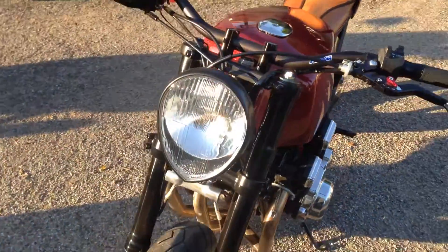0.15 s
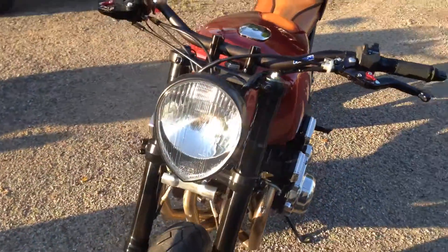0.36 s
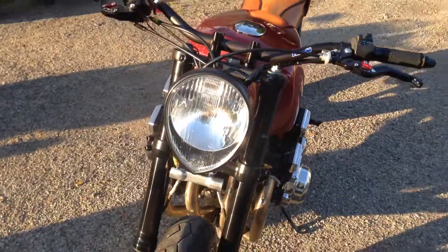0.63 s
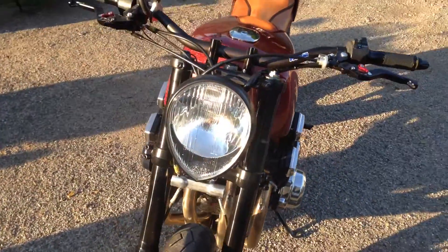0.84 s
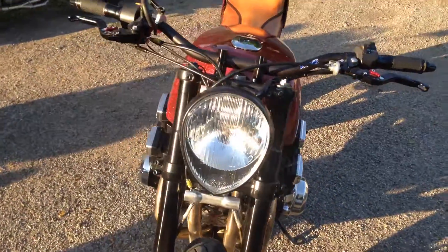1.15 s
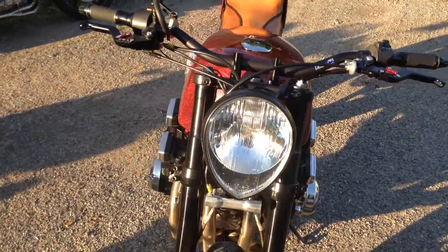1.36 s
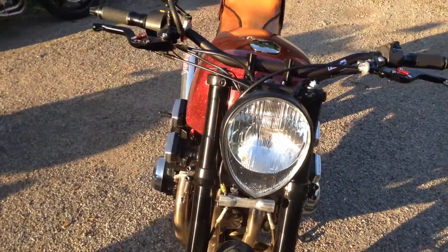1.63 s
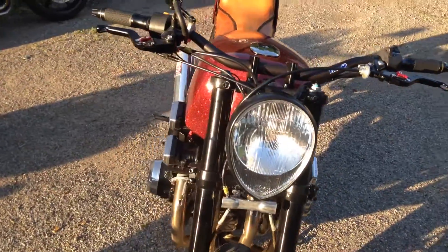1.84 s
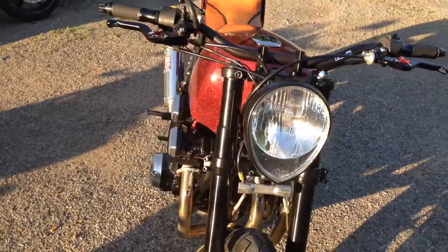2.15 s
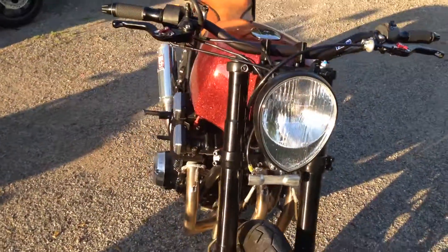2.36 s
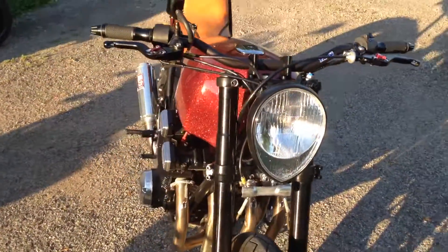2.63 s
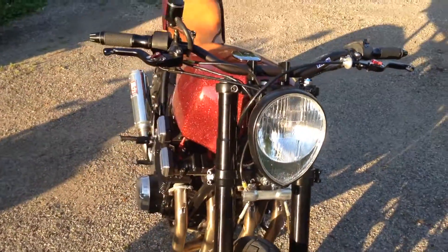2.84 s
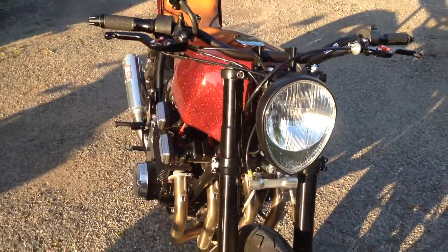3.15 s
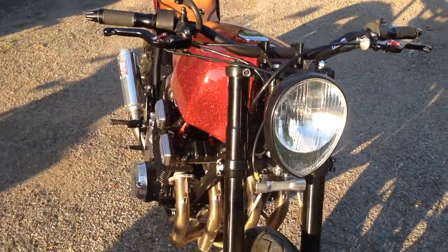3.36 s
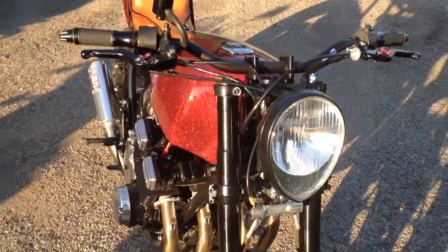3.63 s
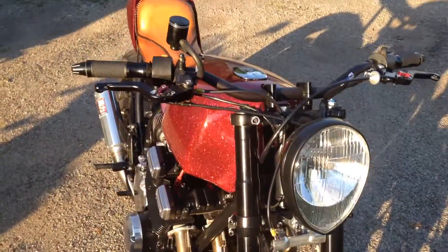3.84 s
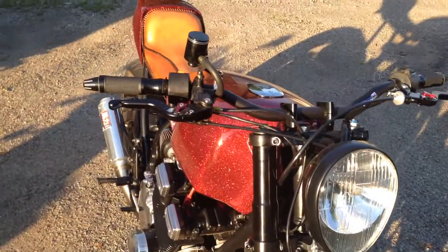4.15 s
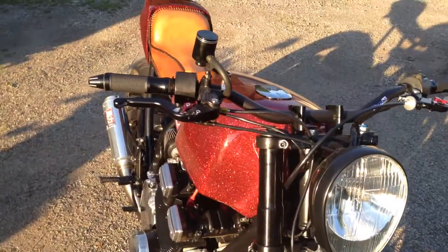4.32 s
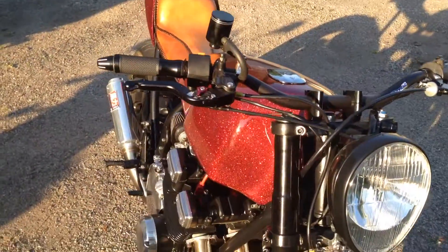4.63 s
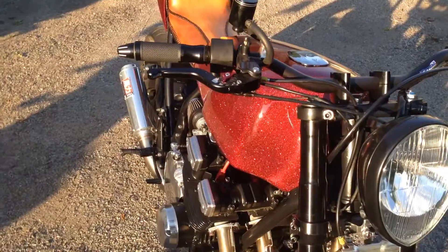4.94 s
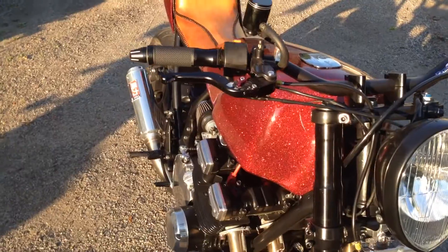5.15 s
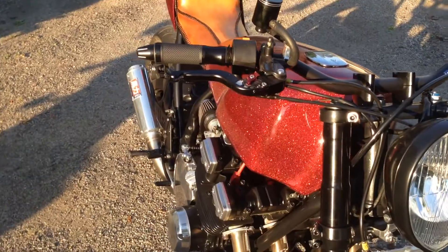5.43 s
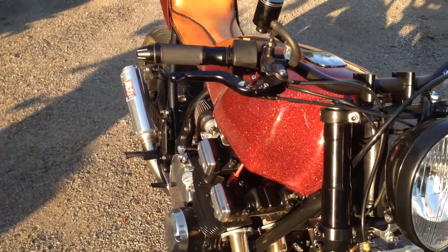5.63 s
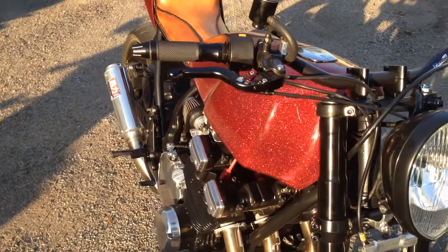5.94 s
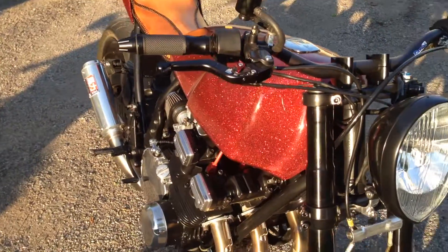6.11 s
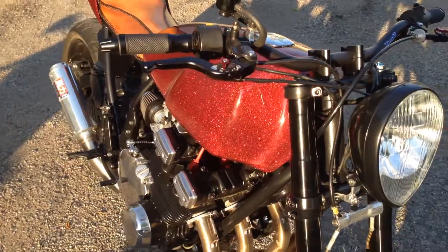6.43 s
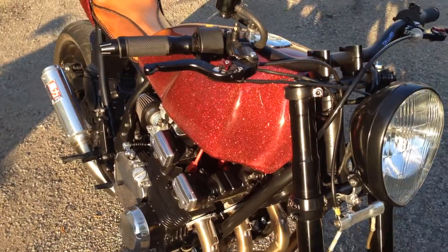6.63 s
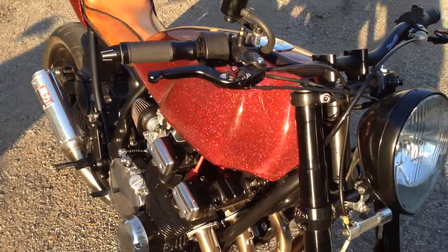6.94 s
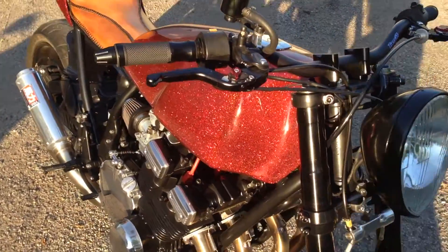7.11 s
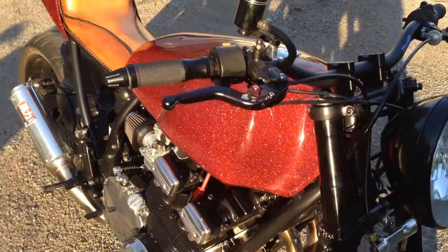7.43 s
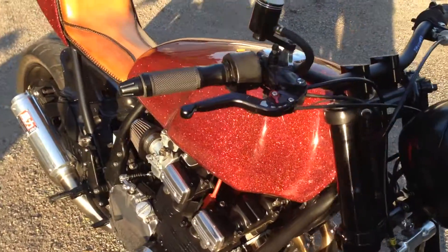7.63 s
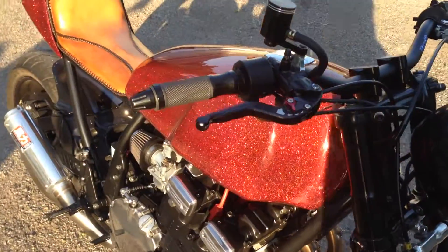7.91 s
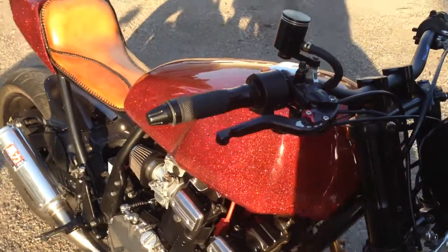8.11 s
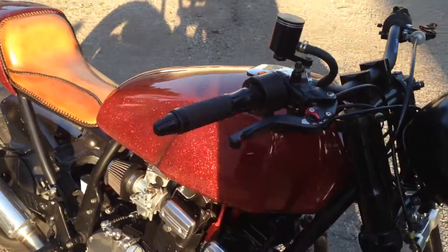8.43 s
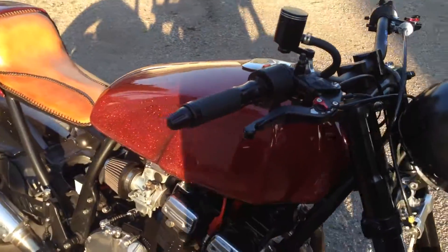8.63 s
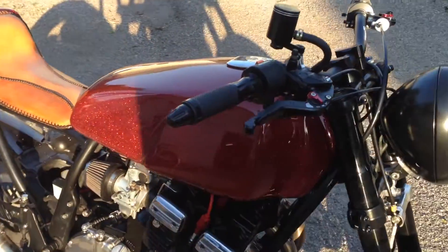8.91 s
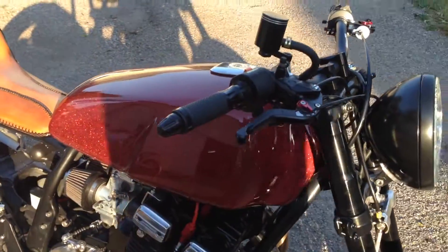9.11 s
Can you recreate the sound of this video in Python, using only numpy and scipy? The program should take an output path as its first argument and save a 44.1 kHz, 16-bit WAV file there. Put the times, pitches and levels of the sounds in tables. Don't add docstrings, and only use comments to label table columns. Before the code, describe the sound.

A four-cylinder motorcycle idles without pause in the open, dry and close to a handheld microphone. The exhaust is a low, hollow burble of about 46 firings a second, grouped into roughly eleven lopes a second because one cylinder fires weakly. Over it lie a dense, bright metallic valve clatter, fine chain sizzle and ringing fins, and airy intake snorts. From 0 s it is heard from one side with a fuller intake hum and pipe note; a slight quickening comes near 0.7 s. By 2 s the microphone is farthest, and around 3.5 s it passes the front wheel, with a few spit-backs. Small lifts follow at 4.4 s and, strongest but brief, 5 s. From 5.5 s the other side brings thicker puffing spits. After 7 s the microphone closes in; clatter grows nearer and louder, spits crowd around 8.6 s, and idling continues to the cut at about 9.3 s.

```python
import sys
import numpy as np
from scipy import signal
from scipy.fft import rfft, irfft
from scipy.io import wavfile
from scipy.ndimage import uniform_filter1d

SR = 44100
rng = np.random.default_rng(int(sys.argv[2]) if len(sys.argv) > 2 else 0)


def gain_from_db(level_db):
    decades = np.asarray(level_db, float) / 20
    return 10 ** decades


def transcribe(signal):
    frames = np.atleast_2d(signal).T
    limited = np.clip(frames, -1, 1)
    pcm = np.round(limited * 32767).astype(np.int16)
    wavfile.write(sys.argv[1], SR, pcm)


N = 408807

START_TURN_CYCLES = -0.084
IDLE_FIRINGS_PER_S = 46
SPEED_KNEE = 0.21
BOOM_DB, BOOM_CLOSER_DB, SILENCER_DB = -28.5, 3, -23.5
END_CAN_DB, OUTLET_DB = -9, -13.5
ECHO_S, ECHO_DB = 0.01093, -1.5
SWELL_DB, SWELL_PLACE, SWELL_LATER = 3, 0.7, 0.39
FAINT_PLACE, FAINT_DB, FAINT_SPREAD_DB = 0.49, -32.5, 3

# time in seconds, change in firings per second, half length in seconds.
SURGES = [(-0.12, -1.3, 0.164), (0.2, 1.1, 0.042), (0.4, -1.0, 0.068), (0.7, 3.0, 0.119),
          (1.69, 1.1, 0.168), (2.01, 2.4, 0.07), (2.05, -2.1, 0.124), (2.76, -1.6, 0.096),
          (2.92, 1.1, 0.036), (3.08, -2.8, 0.093), (3.34, 1.1, 0.07), (3.74, -1.1, 0.039),
          (3.92, -1.9, 0.104), (4.43, 2.8, 0.172), (5.01, 4.4, 0.075), (5.42, -1.5, 0.104),
          (5.63, 1.9, 0.162), (6.42, -1.4, 0.209), (6.65, -2.3, 0.052), (6.88, 1.4, 0.179),
          (7.27, -0.7, 0.035), (7.95, 0.7, 0.157), (8.09, -1.3, 0.078), (8.52, -2.6, 0.116),
          (8.61, 2.2, 0.093), (8.92, -2.3, 0.1)]
# time in seconds, side from left -1 to right 1, step closer 0-1.
WALK = [
    (0, -0.74, 0.27),
    (1.0, -0.75, 0.15),
    (1.9, -0.47, 0),
    (2.7, -0.066, 0.06),
    (3.8, 0.077, 0.14),
    (4.6, 0.59, 0.13),
    (5.7, 0.95, 0.22),
    (6.7, 0.97, 0.34),
    (7.8, 1, 0.78),
    (9.27, 1.0, 1.0),
]
# place in cycle 0-1, strength in dB, blow-down softness in Hz.
CYLINDERS = [
    (0.023, 6.5, 1360),
    (0.261, 15, 184),
    (0.531, 7.5, 1430),
    (.783, 5.2, 1480),
]

# order of the cycle rate, level in dB.
BOOM = (52, 60, .09, -.08, 4, .15), [(2, -3), (3, -17), (4, 0), (5, 0), (6, -6), (7, -5)]
SILENCER = (120, 90, .67, .11, 12, .2), [(8, -7.5), (9, -12.5), (10, -12), (11, -6.5), (12, 0), (13, -8),
            (14, -11)]
COLLECTOR = (192, 12, -.01, .04, 16, .22), [(15, -17), (16, 0), (17, -4), (18, -11)]
LINK_PIPE = (235, 30, .0, -.07, 20, 0), [(19, -7), (20, 0), (21, -5), (22, -9), (23, -10)]
HEADERS = (292, 16, .82, .72, 24, .3), [(24, 0), (25, -11), (26, -8), (27, -17), (28, -5), (30, -12)]
END_CAN = (480, 200, .9, .1, 41, .03), [(40, 0), (41, 0), (42, -3.5), (43, -8.5), (44, -6.5), (45, -4.5),
           (46, -9)]
OUTLET = (565, 200, .92, .4, 48.5, .12), [(47, -6), (48, 0), (49, 0), (50, -1), (51, -7), (52, -7)]
# time in seconds, frequency ratio.
HEADER_WARMING = [(0, 1.015), (4, 1.012), (7.5, 0.998), (9.27, 1.08)]
# frequency in Hz, width in Hz, level in dB.
TAILPIPE = [(352.2, 52, -1), (381, 27.5, 1.5), (415.6, 45, 0), (474, 50, -10), (516.5, 55, -14),
            (551, 60, -16), (626, 250, -21.5)]
# frequency in Hz, level in dB per Hz.
RUMBLE = [(30, -16), (60, 11), (190, -5), (300, -13), (420, 16), (600, -32), (800, -30)]

# frequency in Hz, level in dB per Hz.
INTAKE = [(560, 5), (680, -1.5), (800, -2.5), (1090, -5.5), (1300, -11), (1790, -5.5), (2170, -12.5),
          (2840, -11), (3300, -47)]
# frequency in Hz, width in Hz, level in dB.
THROATS = [(1230, 55, -23), (1385, 180, -16), (1640, 130, -21.5), (1880, 240, -17), (2075, 47, -14.5),
           (2244, 150, -15)]
# place in cycle 0-1, dying time in cycles, level in dB over the steady part.
SNORTS = [(0.28, 0.36, -9), (.62, 0.23, -3), (0.5, 0.42, -32), (0.1, 0.068, -10)]
# time in seconds, peak in dB, frequency in Hz.
CHUFFS = [(0.1491, -25, 1570), (1.1694, -30, 1640), (2.2029, -31, 1430), (3.3558, -30, 1940),
          (3.5099, -25, 1980), (3.6172, -25, 1950), (3.9769, -24.5, 1930), (4.728, -22, 1550),
          (4.8678, -26, 2200), (5.4156, -24, 1230), (5.4969, -25, 2460), (5.7543, -26.5, 2170),
          (6.0825, -29, 2100), (6.2804, -24, 1210), (6.3674, -25, 1440), (6.4492, -27, 2170),
          (6.7271, -32, 1470), (7.076, -25, 1420), (7.5143, -26, 1200), (7.5822, -26, 2510),
          (7.8466, -21.5, 1380), (8.0022, -26, 2040), (8.1998, -26, 2200), (8.4806, -27, 1570),
          (8.6318, -22, 1340), (8.7274, -19, 1690), (8.8017, -23, 1230), (9.103, -20, 1360)]

# frequency in Hz, level in dB per Hz.
GEAR = [(1530, -11.5), (2600, -1), (2850, -3.5), (3370, 2.5), (3760, 3), (4800, 1), (5680, -2.5), (7130, 1),
        (7690, -0.5), (9500, -8.5), (12400, -13), (20900, -120)]
# frequency in Hz, level in dB per Hz.
SIZZLE = [(8000, -17), (8900, -4), (10500, -1), (12500, -5), (13400, 2.5), (14000, -14), (15200, -3.5)]
# place in cycle 0-1, dying time in cycles, level in dB over the steady part.
SEATINGS = [(0.55, 0.24, -10.5), (0.685, 0.13, -17), (0.9, 0.086, -6), (0.045, 0.1, -8)]
# frequency in Hz, width in Hz, level in dB, best heard at seconds, lasting seconds.
FINS = [(3110, 22, -14, 6.5, 4.3), (3363, 24, -18, 2.6, 14), (3370, 30, -17, 6.6, 0.44),
        (4930, 59, -38, 0.7, 2.6), (4900, 420, -10.5, 3.14, 2.4), (5130, 150, -14.5, 7.6, 1.8),
        (6270, 29, -14, 6.66, 1), (6500, 67, -20, 3.3, 2.2), (7150, 20, -11, 4, 2.8),
        (7360, 51, -19, 4.1, 1.8), (8160, 29, -16.5, 3.9, 3), (11340, 60, -20, 4.1, 3.7),
        (11900, 70, -18, 6.1, 2.1), (13240, 100, -14, 6.6, 3.8)]

# dB from the front, gain in dB on the left, on the right, close by,
# dB per extra firing a second.
EXHAUST_HEARD = [
    (-11.5, -1.4, -1.8, -3.5, 1.68),
    (-27.5, 6.5, -1.8, -0.5, 2),
    (-25, 9, 4.5, 1.5, 0.44),
    (-29.5, 1.5, 4, 2, 0.4),
]
ENGINE_HEARD = [
    (-63.5, 22.5, 8.5, 13.8, 0.13),
    (-34.5, -2.5, 0.8, 0.44, 0.16),
    (-36.5, -0.7, -0.7, 6.25, 0.3),
    (-44, -3, 1.5, 3, 0.13),
]


def exhaust(turn):
    collector_db, link_db, headers_db, tail_db = heard_db(EXHAUST_HEARD, turn)
    _, closer = in_time(WALK)
    warming, = in_time(HEADER_WARMING)
    out = gain_from_db(BOOM_DB + BOOM_CLOSER_DB * closer) * pipe(turn, BOOM, rough=0.25)
    out += gain_from_db(SILENCER_DB) * pipe(turn, SILENCER, rough=0.22)
    out += gain_from_db(collector_db) * pipe(turn, COLLECTOR, rough=0.27)
    out += gain_from_db(link_db) * pipe(turn, LINK_PIPE, rough=0.35)
    out += gain_from_db(headers_db) * pipe(turn, HEADERS, rough=0.25, ratio=warming)
    out += gain_from_db(tail_db) * tailpipe(turn)
    out += gain_from_db(tail_db + END_CAN_DB) * pipe(turn, END_CAN, rough=0.43)
    out += gain_from_db(tail_db + OUTLET_DB) * pipe(turn, OUTLET, rough=0.35)
    turbulence = gain_from_db(-36) * coloured(rng.standard_normal(N), RUMBLE)
    return out + turbulence


def pipe(turn, part, rough, ratio=1):
    (hz, width_hz, place, lag, main, sweep), orders = part
    cycle_hz = np.gradient(turn) * SR
    out = 0
    for order, level_db in orders:
        nearness = 1 / np.hypot(1, 2 * (order * cycle_hz - hz * ratio) / width_hz)
        waver = 1 + rough * (drift(3.5) + 1j * drift(3.5))
        phase_turns = order * (turn - place) + lag - sweep * (order - main) ** 2 / 2
        out = out + gain_from_db(level_db) * nearness * np.real(waver * np.exp(2j * np.pi * phase_turns))
    return evened(out)


def tailpipe(turn):
    pulses = firings(turn, spread_db=4.0, jitter_cycles=0.0044)
    lag = round(ECHO_S * SR)
    pulses[lag:] += gain_from_db(ECHO_DB) * pulses[:-lag]
    out = 0
    for hz, width_hz, level_db in TAILPIPE:
        octaves = np.log2(hz / 280)
        depth_db = 2 * SWELL_DB * octaves * (1 + 0.46 * drift(3.6))
        swell_db = depth_db * np.cos(2 * np.pi * (turn - SWELL_PLACE - SWELL_LATER * octaves))
        ring = resonance(resonance(pulses, hz, width_hz), hz, 2 * width_hz)
        out = out + gain_from_db(level_db + swell_db + 1.5 * drift(10)) * ring
    return evened(out)


def firings(turn, spread_db, jitter_cycles):
    out = np.zeros(N)
    cycles = np.arange(-1, 110)
    for place, strength_db, soft_hz in CYLINDERS:
        luck = rng.standard_normal((len(cycles), 2))
        fires_at = cycles + place + jitter_cycles * luck[:, 0]
        at = np.interp(fires_at, turn, np.arange(N), left=0, right=N - 1).astype(int)
        clicks = np.zeros(N)
        clicks[at] = -gain_from_db(strength_db + spread_db * luck[:, 1])
        r = np.exp(-2 * np.pi * soft_hz / SR)
        out += signal.lfilter([(1 - r) ** 2], [1, -2 * r, r * r], clicks + 1e-18)
    return out


def intake(turn, box_db, level_db):
    air = rng.standard_normal(N) * bursts(turn, SNORTS, spread_db=0.5) * gain_from_db(1.42 * drift(16.6))
    box_low = resonance(resonance(air, 875, 80), 875, 120)
    box_high = resonance(resonance(air, 960, 70), 960, 100)
    box = rms_one(box_low + 0.5 * box_high)
    throats = 0
    for hz, width_hz, throat_db in THROATS:
        throats = throats + gain_from_db(throat_db + 4.46 * drift(21.0)) * rms_one(resonance(air, hz, width_hz))
    out = gain_from_db(level_db - 3.0) * (coloured(air, INTAKE) + throats) + gain_from_db(box_db) * box
    for s, peak_db, hz in list(CHUFFS) + faint_spits(turn):
        at = round(s * SR) - 90
        puff = spit_back(peak_db, hz)
        out[at:at + len(puff)] += puff[:N - at]
    return out


def spit_back(peak_db, hz):
    t = np.arange(round(0.06 * SR)) / SR
    puff = (1 - np.exp(-t / 0.004)) * np.exp(-t / 0.014)
    spit = resonance(resonance(rng.standard_normal(len(t)), hz, 330), hz, 500)
    return gain_from_db(peak_db - 2.5) * puff * rms_one(spit)


def faint_spits(turn):
    luck = rng.standard_normal((105, 3))
    places = np.arange(1, 106) + FAINT_PLACE + 0.08 * luck[:, 0]
    s = np.interp(places, turn, np.arange(N) / SR)
    peak_db = FAINT_DB + FAINT_SPREAD_DB * luck[:, 1]
    return list(zip(s, peak_db, 1650 * np.exp(0.18 * luck[:, 2])))


def valve_gear(turn, level_db, bright_db):
    struck = rng.random((2, N)) < 9000 / SR
    ticks = struck * gain_from_db(2.16 * rng.exponential(1, (2, N))) * rng.choice([-1, 1], (2, N))
    noise = ticks + 1.36 * rng.standard_normal((2, N))
    clatter = rms_one(noise[0] * bursts(turn, SEATINGS, spread_db=5.5))
    chain = rms_one(noise[1] * bursts(turn, SEATINGS, spread_db=4.5))
    t = np.arange(N) / SR
    fins = 0
    for hz, width_hz, fin_db, best_s, lasting_s in FINS:
        facing_db = -9 * np.minimum(((t - best_s) / lasting_s) ** 2, 3)
        ring = rms_one(resonance(clatter, hz, 1.3 * width_hz))
        fins = fins + gain_from_db(fin_db + facing_db + 2.3 * drift(7)) * ring
    cases = gain_from_db(level_db) * (coloured(clatter, GEAR) + fins)
    return cases + gain_from_db(bright_db + 0.91 * drift(10.0)) * coloured(chain, SIZZLE)


def bursts(turn, table, spread_db):
    envelope = np.ones(N)
    for place, dying_cycles, level_db in table:
        since = turn + 2 - place
        luck = gain_from_db(level_db + spread_db * rng.standard_normal(120))
        envelope += luck[since.astype(int)] * np.exp(-(since % 1) / dying_cycles)
    return uniform_filter1d(envelope, size=160)


def firings_per_s():
    t = np.arange(N) / SR
    rate = IDLE_FIRINGS_PER_S
    for s, change, half_s in SURGES:
        rate = rate + change * np.exp(-0.5 * ((t - s) / half_s) ** 2)
    return rate


def heard_db(parts, turn):
    side, closer = in_time(WALK)
    left, right = np.maximum(-side, 0), np.maximum(side, 0)
    extra = np.gradient(turn) * 4 * SR - IDLE_FIRINGS_PER_S
    effort = extra * (1 - SPEED_KNEE * extra)
    return [front_db + left_db * left + right_db * right + close_db * closer + follows_db * effort
            for front_db, left_db, right_db, close_db, follows_db in parts]


def in_time(rows):
    s, *columns = np.transpose(rows)
    return [np.interp(np.arange(N) / SR, s, c) for c in columns]


def resonance(x, hz, width_hz):
    r = np.exp(-np.pi * width_hz / SR)
    poles = [1, -2 * r * np.cos(2 * np.pi * hz / SR), r * r]
    return signal.lfilter(np.array([1, 0, -1]) * (1 - r * r) / 2, poles, x)


def coloured(x, spectrum):
    hz, level_db = np.transpose(spectrum)
    grid_hz = np.fft.rfftfreq(N, 1 / SR) + 1
    gain = gain_from_db(np.interp(np.log(grid_hz), np.log(hz), level_db, left=-99, right=-99))
    return rms_one(irfft(rfft(x) * gain, N))


def drift(rate_hz):
    r = np.exp(-80 * np.pi * rate_hz / SR)
    slow = signal.lfilter([1], [1, -2 * r, r * r], rng.standard_normal(N // 40 + 2002))[2000:]
    return np.interp(np.arange(N) / 40, np.arange(len(slow)), rms_one(slow))


def evened(x):
    slow = uniform_filter1d(uniform_filter1d(x ** 2, size=SR // 11), size=SR // 11)
    return x / np.sqrt(slow + 1e-20)


def rms_one(x):
    return x / np.sqrt(np.mean(x ** 2) + 1e-20)


def scene():
    turn = START_TURN_CYCLES + np.cumsum(firings_per_s()) / (4 * SR)
    box_db, intake_db, gear_db, chain_db = heard_db(ENGINE_HEARD, turn)
    mix = exhaust(turn) + intake(turn, box_db, intake_db) + valve_gear(turn, gear_db, chain_db)
    return mix[None]


def band_limit(x):
    return signal.sosfilt(signal.butter(12, 15200, fs=SR, output="sos"), x)


def record(dry):
    cut = signal.sosfilt(signal.butter(4, 42, "high", fs=SR, output="sos"), dry)
    mix = 1.58 * np.tanh(cut / 1.575)
    return band_limit(mix)


dry = scene()
out = record(dry)
transcribe(out)
```